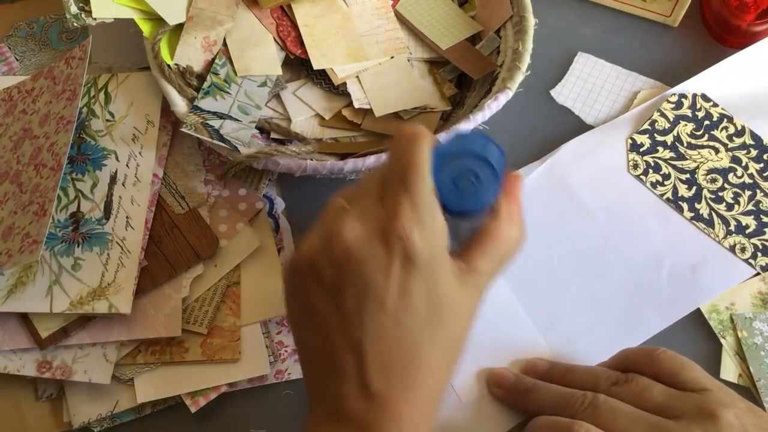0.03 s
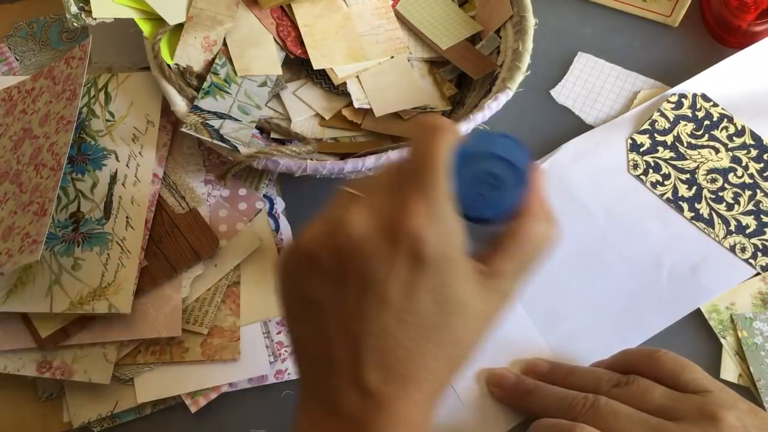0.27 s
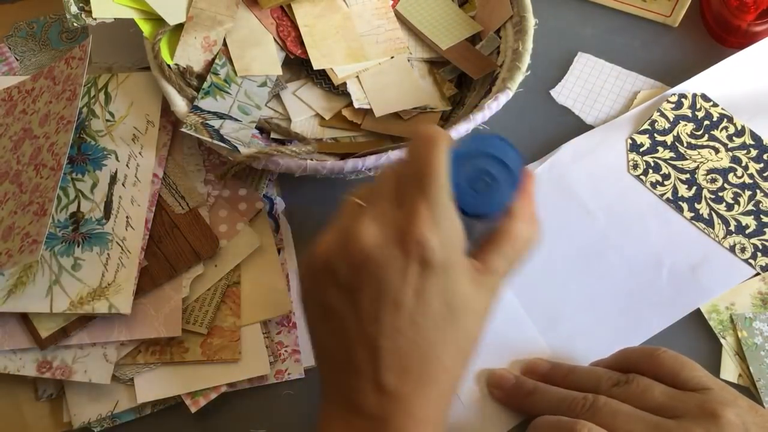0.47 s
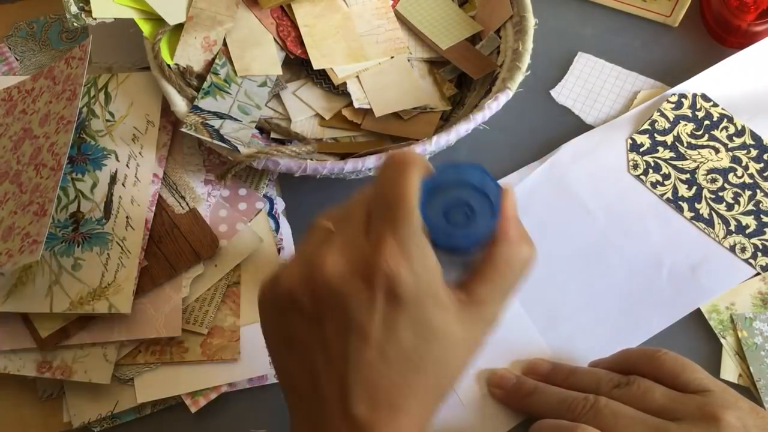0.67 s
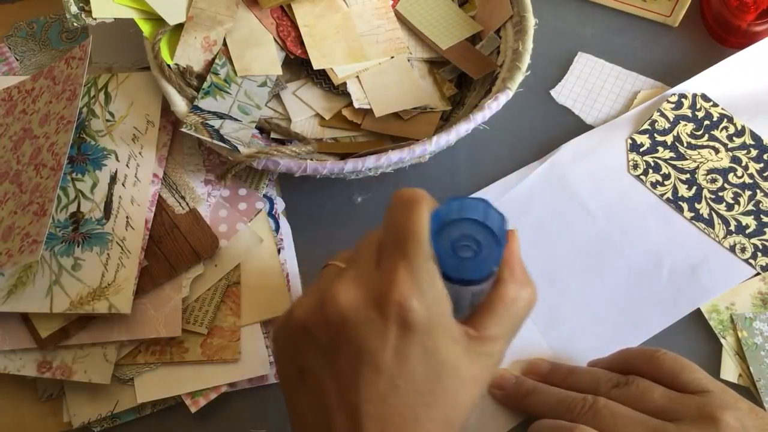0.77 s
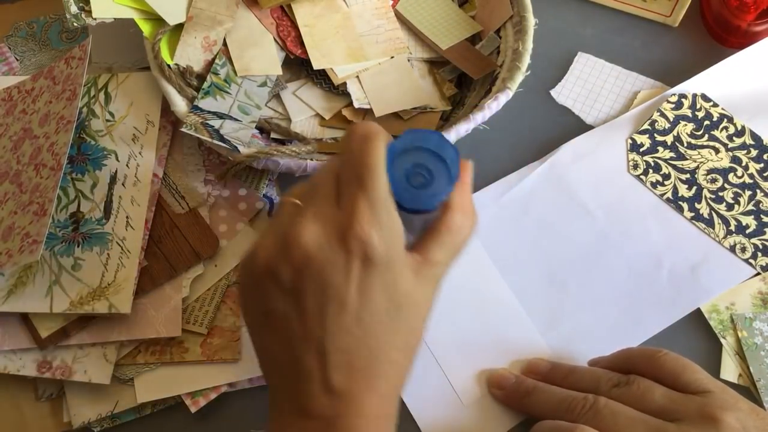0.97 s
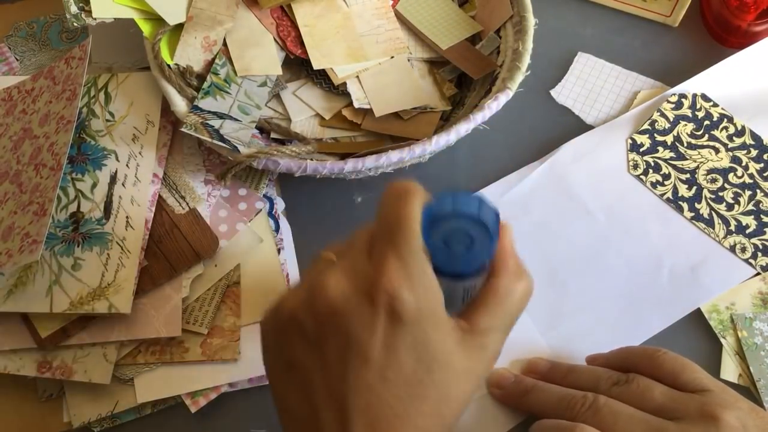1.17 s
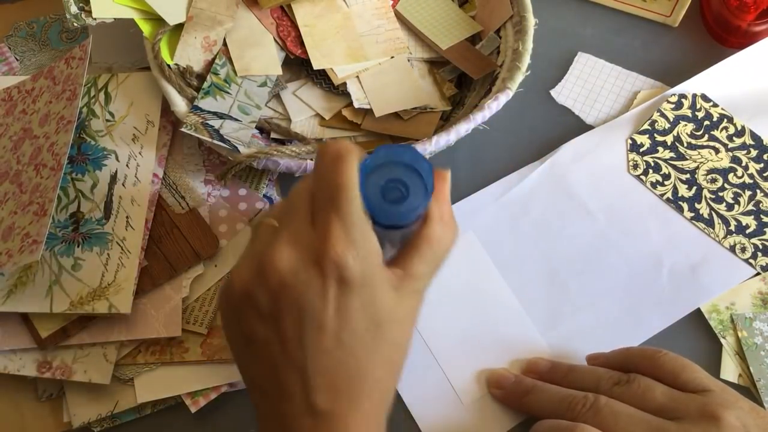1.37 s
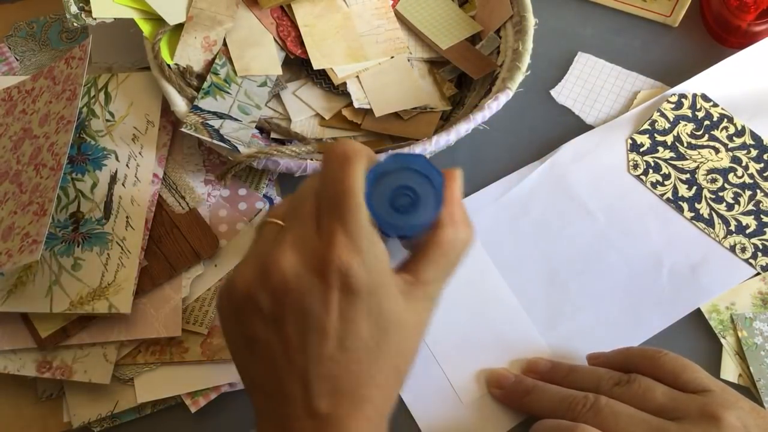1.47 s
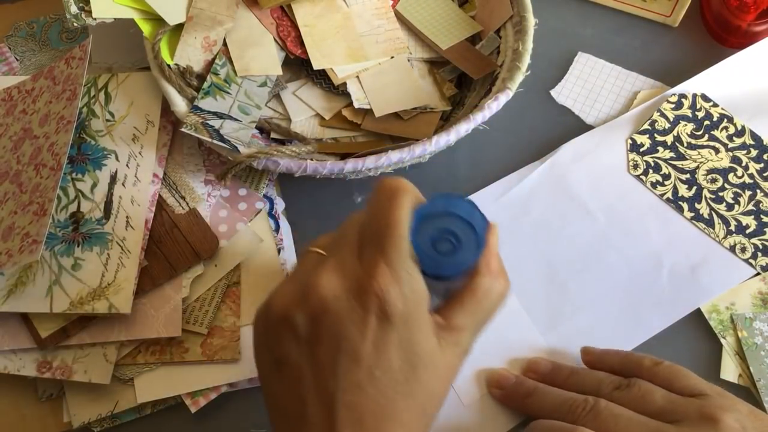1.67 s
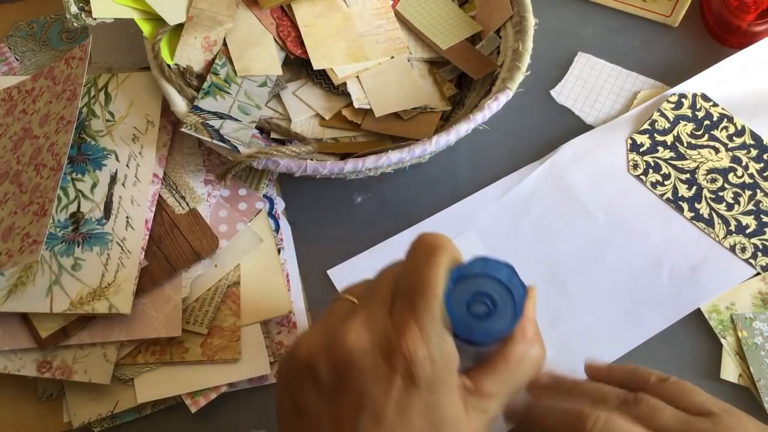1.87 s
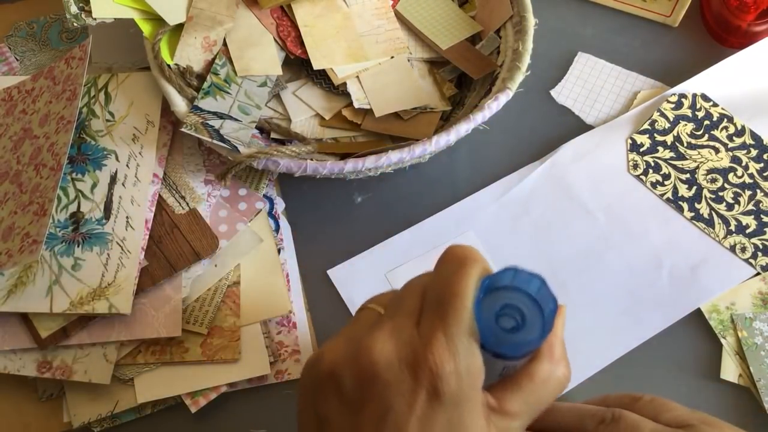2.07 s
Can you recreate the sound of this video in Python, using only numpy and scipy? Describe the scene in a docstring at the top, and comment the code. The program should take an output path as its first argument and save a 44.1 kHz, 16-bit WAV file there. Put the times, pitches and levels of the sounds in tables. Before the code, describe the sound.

Five cushioned table knocks from a glue stick pressed onto paper, each with a sticky snap

```python
"""Glue stick dabbed on paper

Five dabs land on a sheet of paper on a table in a small, quiet room. Each opens with a crackle of
tacky glue, built from filtered snaps; then a cushioned push rings the table's modes and rattles the tube.
Soft bumps on the same modes follow as the stick is pulled off. Late on, band-limited snaps make the paper
tick and a swell of grains makes it slide. Reverberation and shaped noise place it all in the room."""
import sys
import numpy as np
from scipy import signal
from scipy.fft import rfft, irfft
from scipy.io import wavfile

SR = 44100
rng = np.random.default_rng(int(sys.argv[2]) if len(sys.argv) > 2 else 0)


def file_out(sig):
    """Save sig as 16-bit WAV at sys.argv[1]."""
    # one column per channel
    cols = np.atleast_2d(sig).T
    # limit, then scale
    lim = np.clip(cols, -1, 1)
    pcm = np.round(lim * 32767).astype(np.int16)
    wavfile.write(sys.argv[1], SR, pcm)


N = 93933
T = np.arange(N) / SR   # time [s]

# All table levels are relative: later mix gains and filters also shape what is heard.
# dabs of the stick: (time [s], push level [dB], contact hardness [Hz], crackle level [dB],
# crackle low edge [Hz], crackle high edge [Hz])
DABS = [(.0127, -2, 215, -16, 3360, 6300), (.4680, 1, 350, -16, 1500, 6000),
        (.8601, -0.5, 270, -19, 2360, 7300), (1.3066, -0.5, 340, -14, 1950, 6160),
        (1.6783, 0, 577, -11.5, 910, 4300)]
# soft bumps as the stick is pulled off: (time [s], push level [dB], contact hardness [Hz])
PULL_OFF_BUMPS = [(.14, -21.5, 131), (0.26, -19.5, 179), (0.669, -21, 127), (0.686, -20, 111)]
# modes of the table top: (frequency [Hz], level [dB], t60 [s])
TABLE_MODES = [(88.1, -31.5, 0.32), (102.2, -31, 0.16), (189.5, -29, 0.17), (215, -37.5, 0.22),
               (270.5, -32, 0.15), (293, -37, 0.18), (363.5, -18.5, 0.12), (439.2, -35.5, 0.3),
               (462.3, -25.5, 0.086), (530.5, -27, 0.14), (670.3, -19.5, 0.081), (961, -28.5, 0.12),
               (1101.4, -26.5, 0.056), (1305, -22.5, 0.035)]
# first reflections from nearby surfaces: (delay [s], level [dB])
NEAR_ECHOES = [(.0034, -4.5), (0.0175, -7), (0.0273, -10.5)]
# the room's answer to a knock: (frequency [Hz], level [dB], t60 [s])
KNOCK_ROOM = [(61.7, -15.5, 0.41), (120, -14, 1), (204, -5.5, 0.64), (352, -18.5, 0.32), (676, -14, 0.32),
              (1500, -5.5, 0.28), (4000, -4, 0.17)]
# the room's answer to crackle and ticks: (frequency [Hz], level [dB], t60 [s])
CRACKLE_ROOM = [(985, 21, 0.092), (2310, -5, 0.21), (4950, -15.5, 0.12), (8900, -8.5, 0.065),
                (15000, 2, 0.14)]
# ticks of the paper: (time [s], level [dB])
PAPER_TICKS = [(.233, -63), (.611, -65), (.704, -63), (1.095, -60), (1.12, -67), (1.8832, -50),
               (1.888, -44), (1.8903, -29), (1.8952, -42), (1.945, -41.5), (2.076, -64)]
# spectrum of the room background: (frequency [Hz], level [dB per Hz])
AIR_SPECTRUM = [(18, -62), (30, -73), (68, -4), (113, 1.5), (155, -12.5), (244, -8), (363, -16.5),
                (513, -17), (651, -22.5), (784, -24), (1140, -22.5), (1480, -22.5), (7670, -43.5),
                (15300, -52), (17000, -44)]

PUSH_LAG_S = 0.00043   # the glue gives way before the push reaches the table
MODE_SCATTER_DB = 1.71   # each contact lands on another spot and shares its push differently
ECHO_CUT_HZ = 510
TUBE_DB, TUBE_T60_S, TUBE_BAND_HZ = -19.5, 0.054, [895, 4300]
TACK_LEAD_S, TACK_SPREAD_S = 0.0012, 0.001   # the cluster starts ahead of the main snap
TACK_GRAIN_DB, TACK_GRAINS_PER_S, TACK_FIZZ_DB = -23.5, 11000, -24
TACK_RING_HZ, TACK_RING_DB = [3620, 5100], -7   # the mouth of the tube lifts this band
CRACKLE_ECHO_S, CRACKLE_ECHO_DB = 0.017, -12   # a second wave of reverberation comes back from a wall
TICK_LOW_HZ, TICK_HIGH_HZ, TICK_T60_S = 4300, 9400, 0.0075
TICK_FLUTTER_DB, TICK_BODY_DB, TICK_FIZZ_DB, TICK_ROOM_DB = -21, 10, -12.5, -1.5
SLIDE_S, SLIDE_WIDTH_S, SLIDE_DB = 2.08, 0.025, -75.5
SLIDE_GRAINS_PER_S, SLIDE_BAND_HZ = 3300, [3950, 15000]
AIR_DB = -59   # RMS ahead of the final filters
CUTOFF_HZ = 17200


def knocks():
    """Table and tube, answered by near surfaces and the room."""
    direct = table_top() + tube()
    reflections = sum(from_db(db) * delayed(direct, s) for s, db in NEAR_ECHOES)
    early = filt(reflections, ECHO_CUT_HZ, "low", order=1)
    return direct + early + room(direct, KNOCK_ROOM, build_s=0.0068)


def table_top():
    """Every push rings the table's modes, each a decaying sine."""
    contacts = DABS + PULL_OFF_BUMPS
    pushes = np.array([push(s + PUSH_LAG_S, db, hz) for s, db, hz, *_ in contacts])
    shares = from_db(MODE_SCATTER_DB * rng.standard_normal((len(pushes), len(TABLE_MODES))))
    out = 0
    for k, (hz, db, t60) in enumerate(TABLE_MODES):
        force = shares[:, k] @ pushes
        ring = np.sin(2 * np.pi * hz * T) * dying(t60)
        polarity = (-1) ** k
        out = out + polarity * from_db(db) * convolve(force, ring)
    return out


def push(s, db, hardness_hz):
    """The force of one cushioned contact: the harder, the shorter."""
    r = np.exp(-2 * np.pi * hardness_hz / SR)
    impulse = from_db(db) * click(s) + 1e-18
    return signal.lfilter([(1 - r) ** 2], [1, -2 * r, r * r], impulse)


def tube():
    """The plastic tube rattles briefly, more after a hard dab: noise follows the decaying push energy."""
    force = sum(push(s + PUSH_LAG_S, db, hz) for s, db, hz, *_ in DABS)
    energy = convolve(force ** 2, dying(TUBE_T60_S) ** 2)
    rattle = rng.standard_normal(N) * np.sqrt(np.abs(energy))
    return from_db(TUBE_DB) * filt(rattle, TUBE_BAND_HZ, "band")


def tack():
    """Glue meets paper: one snap in a short cluster of tiny ones."""
    out = 0
    for s, _, _, db, low_hz, high_hz in DABS:
        cluster = np.exp(-np.abs(T - s) / TACK_SPREAD_S) * (T > s - TACK_LEAD_S)
        snaps = click(s) + from_db(TACK_GRAIN_DB) * grains(TACK_GRAINS_PER_S) * cluster
        body = filt(filt(snaps, high_hz, "low", order=3), low_hz, "high")
        ring = from_db(TACK_RING_DB) * filt(body, TACK_RING_HZ, "band", order=1)
        fizz = from_db(TACK_FIZZ_DB) * filt(snaps, 12000, "high")
        out = out - from_db(db) * (body + ring + fizz)
    return out + bright_room(out)


def paper():
    """The sheet ticks faintly under the fingers, sharply as they let go, then slides a little."""
    decay = dying(TICK_T60_S)
    flutter = sum(from_db(db) * np.interp(T - s, T, decay, left=0) for s, db in PAPER_TICKS)
    snaps = sum(from_db(db) * click(s) for s, db in PAPER_TICKS)
    snaps = snaps + from_db(TICK_FLUTTER_DB) * flutter * rng.standard_normal(N)
    body = from_db(TICK_BODY_DB) * filt(snaps, [TICK_LOW_HZ, TICK_HIGH_HZ], "band")
    fizz = from_db(TICK_FIZZ_DB) * filt(snaps, TICK_HIGH_HZ, "high")
    ticks = body - fizz
    rub = filt(grains(SLIDE_GRAINS_PER_S), SLIDE_BAND_HZ, "band", order=1)
    swell = np.exp(-((T - SLIDE_S) / SLIDE_WIDTH_S) ** 2)
    slide = from_db(SLIDE_DB) * rub / rub.std() * swell
    return ticks + from_db(TICK_ROOM_DB) * bright_room(ticks) + slide


def grains(per_s):
    """Random tiny snaps of uneven size."""
    return (rng.random(N) < per_s / SR) * rng.standard_normal(N)


def bright_room(x):
    """The room's answer to small, sharp sounds: a first wave and a later, weaker one."""
    first = room(x, CRACKLE_ROOM, build_s=0.0018)
    second = delayed(room(x, CRACKLE_ROOM, build_s=0.0022), CRACKLE_ECHO_S)
    return first + from_db(CRACKLE_ECHO_DB) * second


def room(x, table, build_s):
    """Diffuse reverberation: half-octave noise bands that swell briefly and die at their own rates."""
    white = rng.standard_normal((2, N))   # neighbouring bands take turns
    response = 0
    edges = 45 * 2 ** np.arange(0, 9, .5)
    swell = 1 - np.exp(-(T / build_s) ** 2)
    for k, (low, high) in enumerate(zip(edges, edges[1:])):
        db, t60 = at_hz(table, np.sqrt(low * high))
        band = filt(white[k % 2], [low, high], "band") * dying(t60) * swell
        # energy in proportion to bandwidth
        level = np.sqrt(2 * (high - low) / SR / np.sum(band ** 2))
        response = response + from_db(db) * band * level
    return convolve(x, response)


def air():
    """Steady rumble and faint hiss of the room: white noise shaped by a spectrum."""
    hz = np.maximum(np.arange(N // 2 + 1) * SR / N, 1)
    db, = at_hz(AIR_SPECTRUM, hz)
    noise = irfft(rfft(rng.standard_normal(N)) * from_db(db), N)
    return from_db(AIR_DB) * noise / noise.std()


def from_db(db):
    """Decibels to gain."""
    return 10 ** (np.asarray(db) / 20)


def filt(x, hz, kind, order=2):
    """Butterworth filter."""
    sos = signal.butter(order, np.clip(hz, 10, .45 * SR), kind, fs=SR, output="sos")
    return signal.sosfilt(sos, x + 1e-18)


def at_hz(rows, hz):
    """Each column of a table, read on a log-frequency axis."""
    freqs, *columns = np.transpose(rows)
    return [np.interp(np.log(hz), np.log(freqs), c) for c in columns]


def delayed(x, s):
    """The same sound, s seconds later."""
    return np.interp(T - s, T, x, left=0)


def click(s):
    """A unit impulse."""
    return 1.0 * (np.arange(N) == int(s * SR))


def convolve(x, response):
    """Play a sound through an impulse response."""
    return signal.fftconvolve(x, response)[:N]


def dying(t60):
    """An envelope that falls 60 dB in t60 seconds."""
    return np.exp(-np.log(1000) * T / t60)


def scene():
    """All sources at one microphone, which sheds the deepest bass of the knocks."""
    lean_knocks = filt(knocks(), 67, "high", order=4)
    return (lean_knocks + tack() + paper() + air())[None]


def record(dry):
    """Subsonic rumble and the extreme treble are cut."""
    top_cut = signal.ellip(10, .1, 80, CUTOFF_HZ, fs=SR, output="sos")
    return signal.sosfilt(top_cut, filt(dry, 30, "high"))


dry = scene()
out = record(dry)
file_out(out)
```